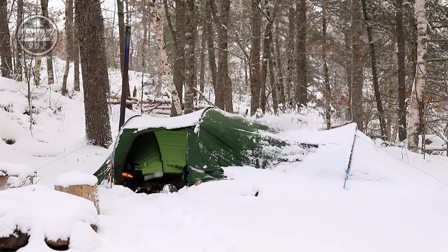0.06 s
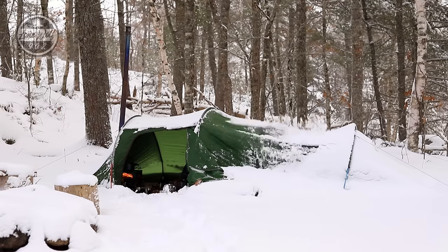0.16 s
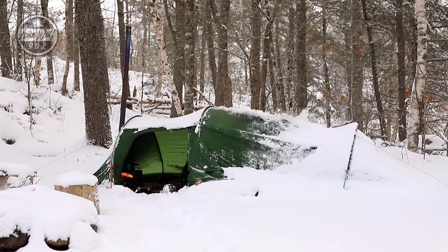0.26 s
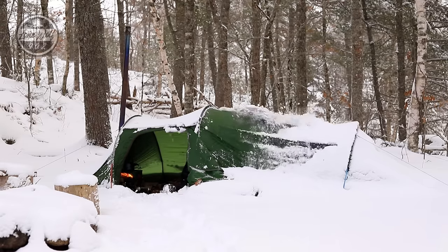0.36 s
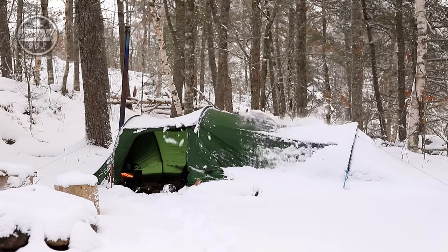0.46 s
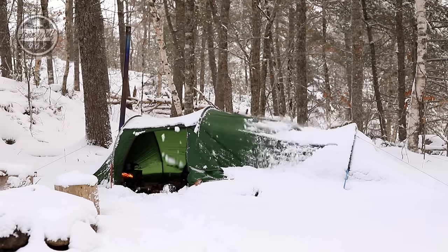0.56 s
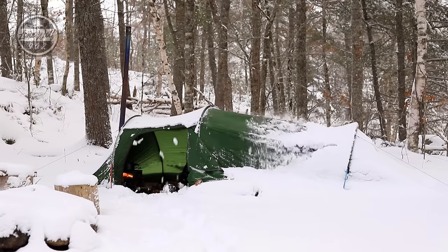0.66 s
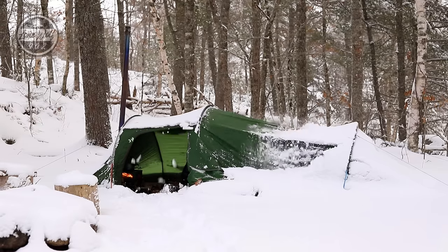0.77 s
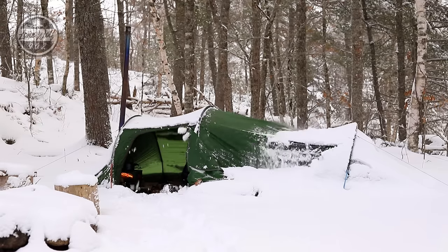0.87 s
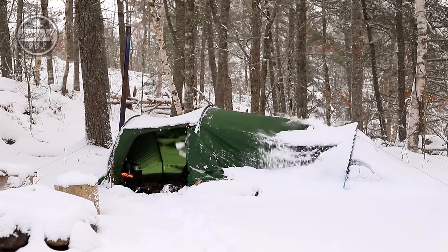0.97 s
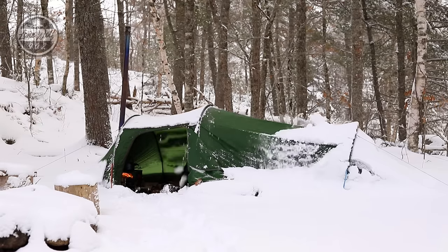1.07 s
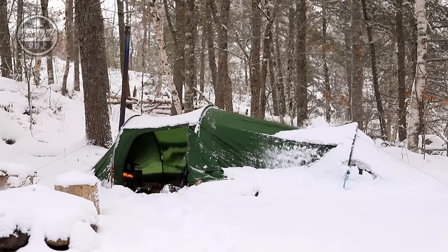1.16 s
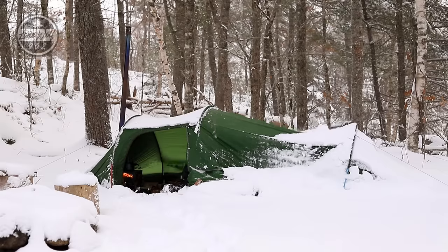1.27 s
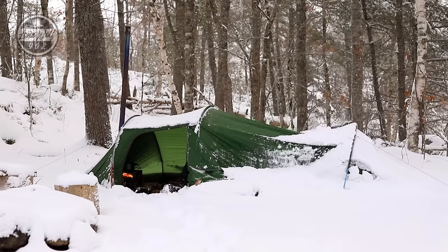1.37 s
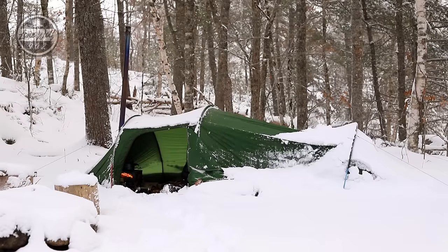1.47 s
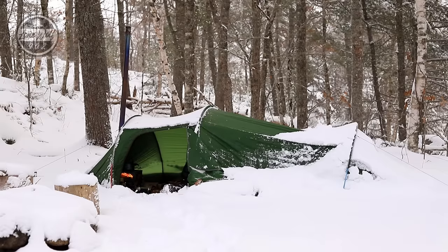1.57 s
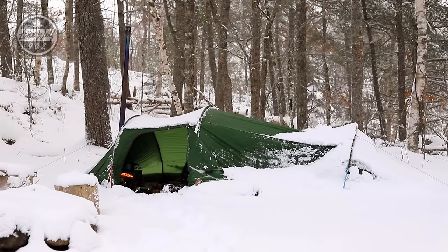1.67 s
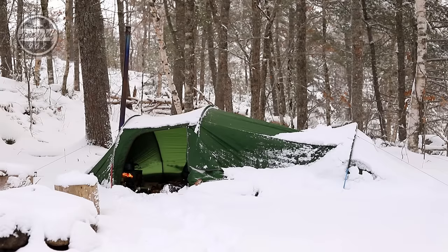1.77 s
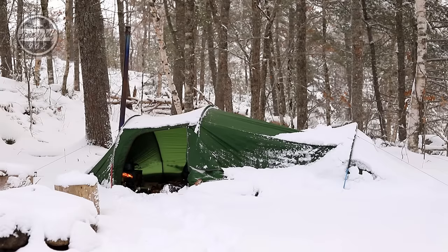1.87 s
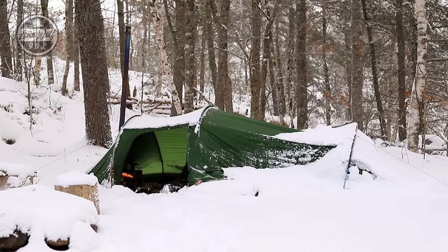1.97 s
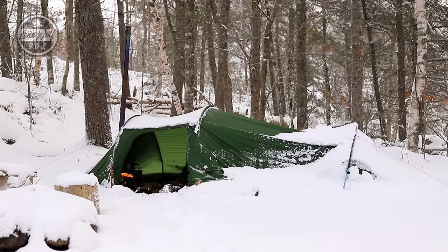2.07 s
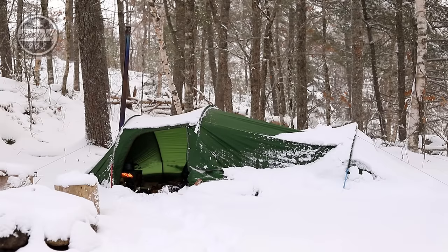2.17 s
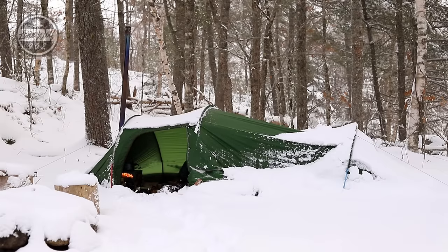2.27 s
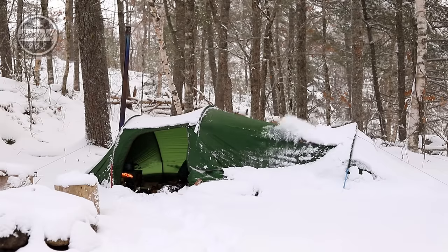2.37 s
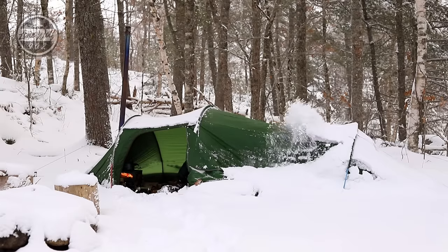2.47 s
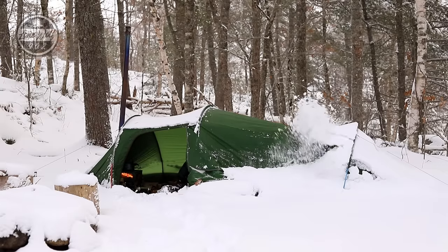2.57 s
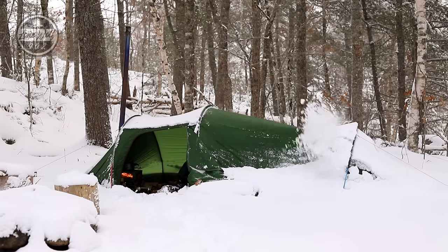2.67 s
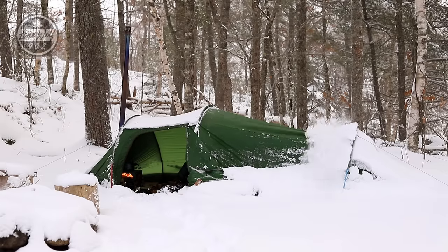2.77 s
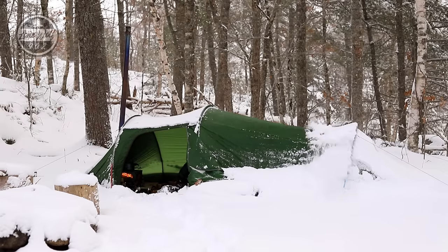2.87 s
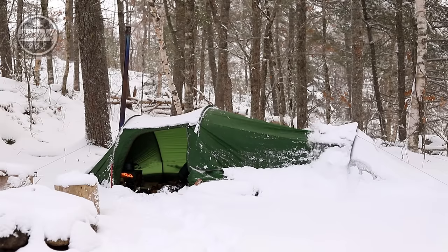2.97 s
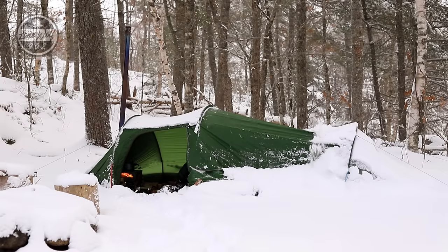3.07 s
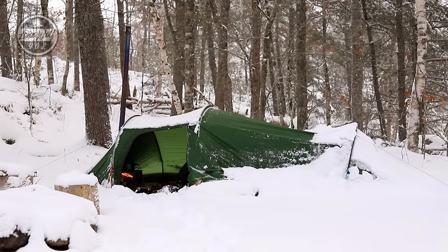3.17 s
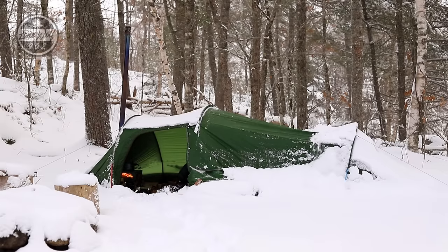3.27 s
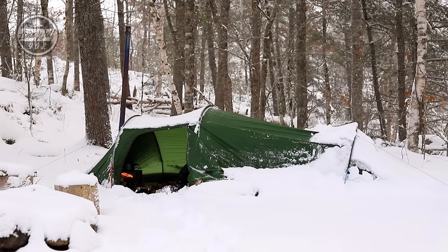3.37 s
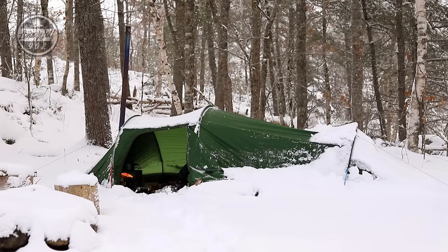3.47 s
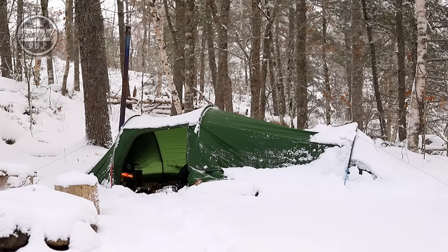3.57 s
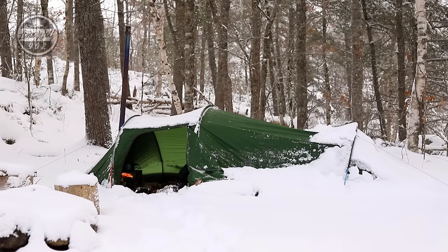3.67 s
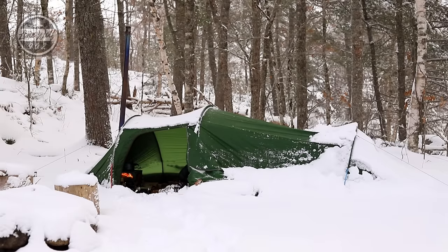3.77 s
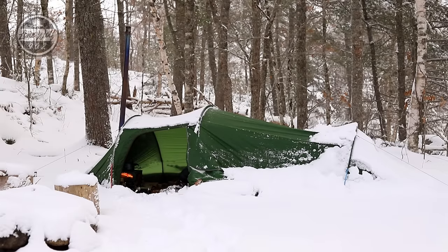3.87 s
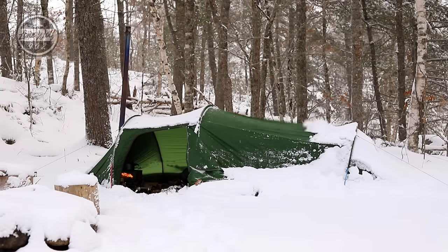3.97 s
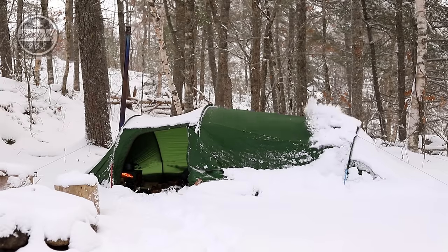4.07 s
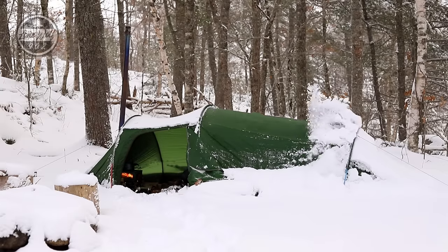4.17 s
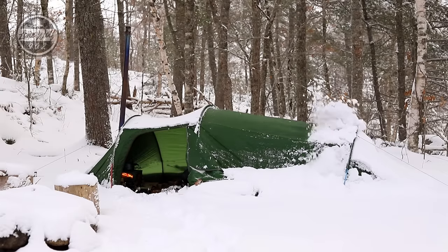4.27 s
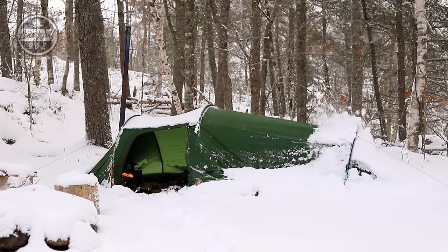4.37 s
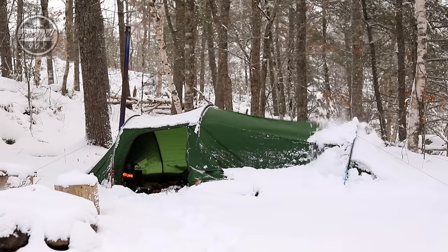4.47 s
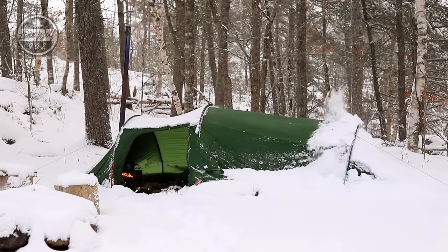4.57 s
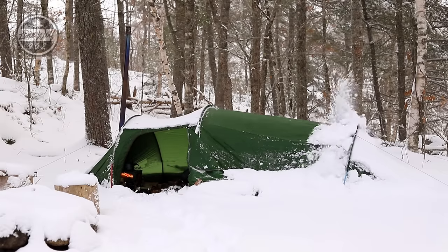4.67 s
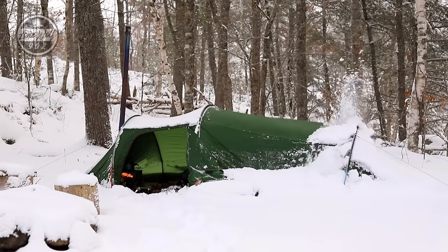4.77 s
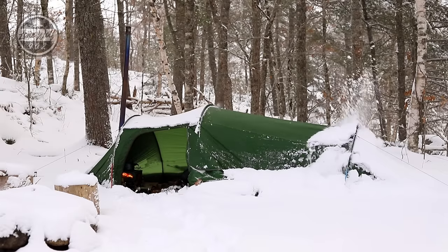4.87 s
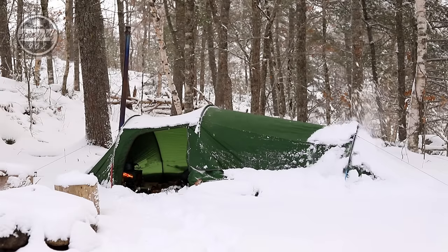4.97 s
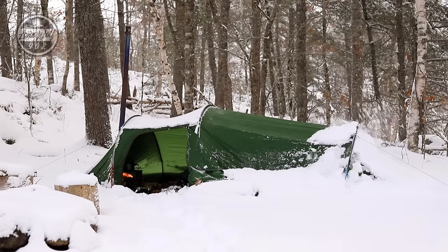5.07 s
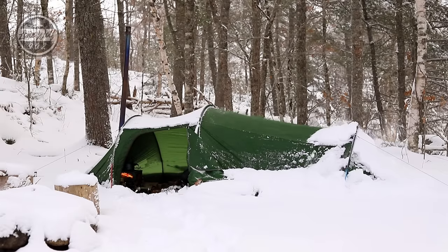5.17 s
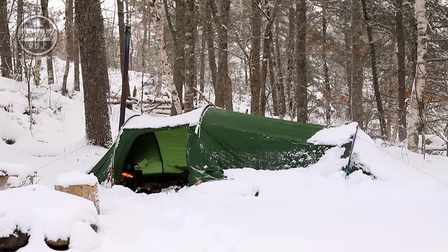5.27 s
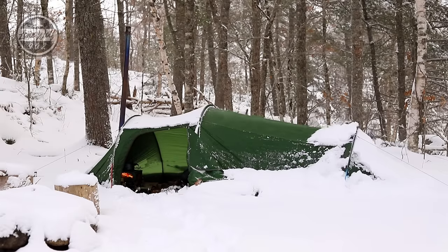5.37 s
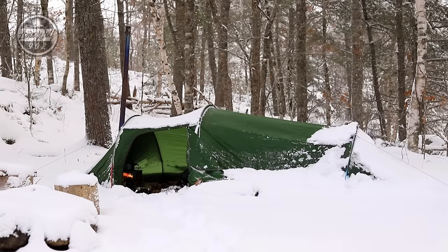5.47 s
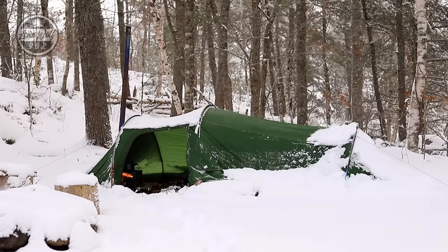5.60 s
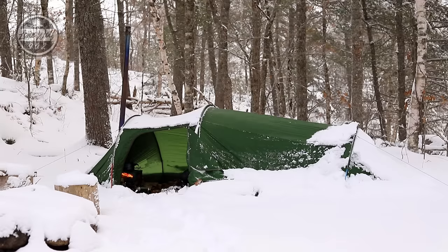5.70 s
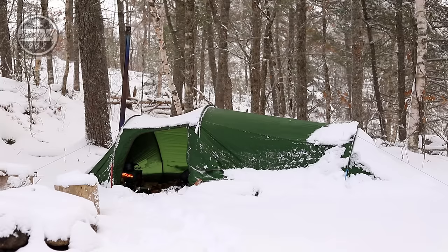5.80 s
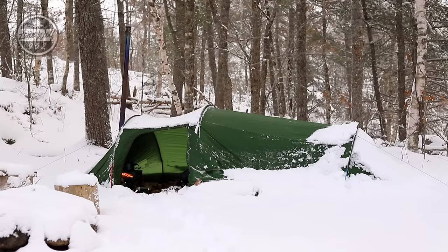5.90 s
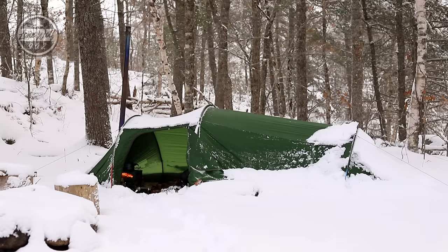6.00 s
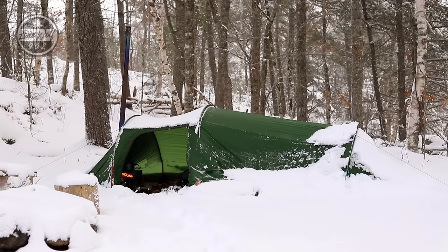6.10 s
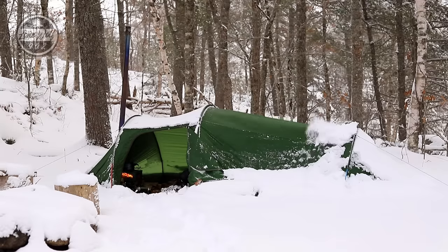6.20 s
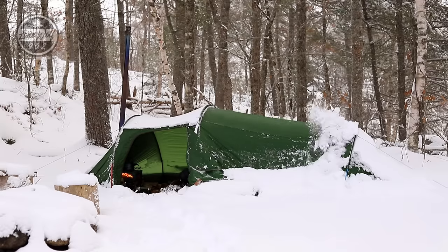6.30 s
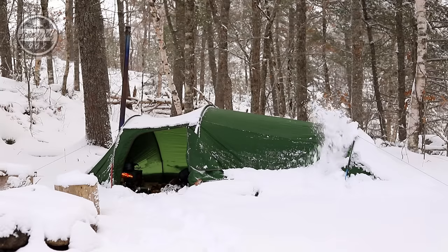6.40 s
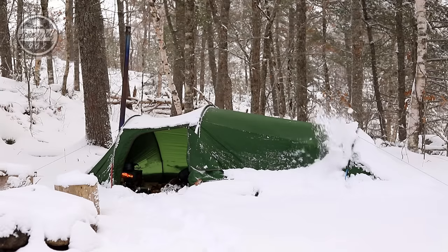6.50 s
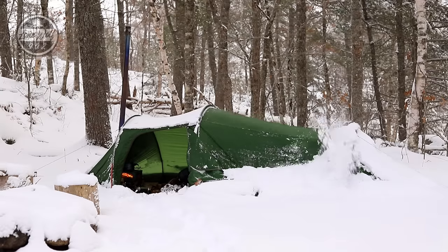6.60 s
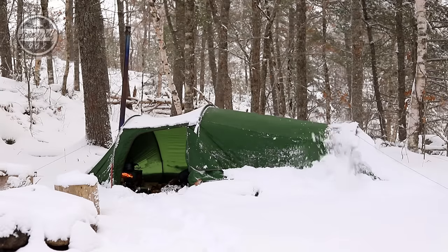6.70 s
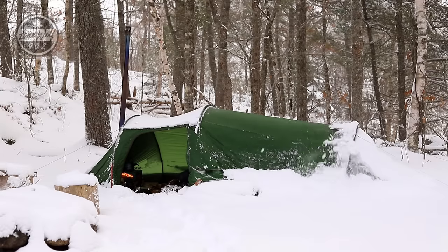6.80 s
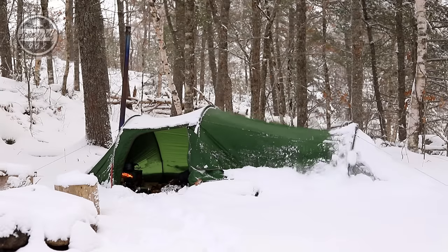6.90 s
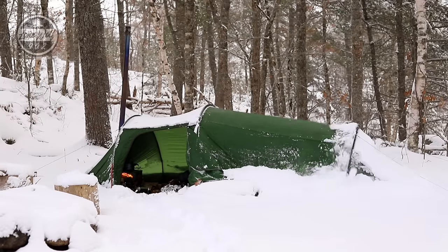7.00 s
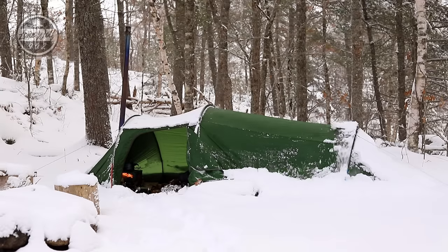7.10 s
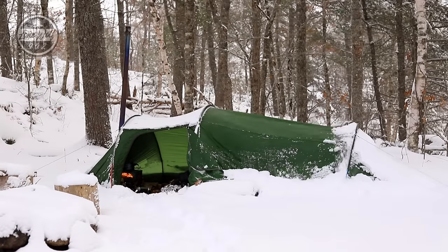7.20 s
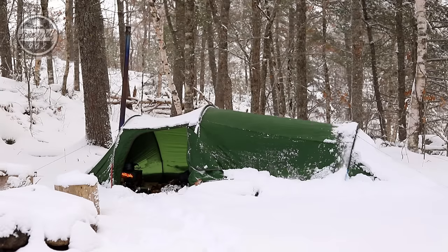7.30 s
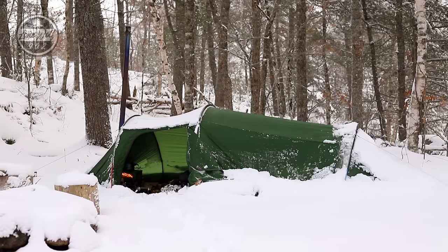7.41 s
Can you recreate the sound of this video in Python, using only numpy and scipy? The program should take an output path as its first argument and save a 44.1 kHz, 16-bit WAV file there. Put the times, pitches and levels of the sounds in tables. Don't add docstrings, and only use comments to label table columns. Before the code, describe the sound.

A quiet winter forest, heard in mono from a few metres away, with faint low air and slight microphone hiss. Snow already trickles down a tent roof; from 0.25 s quick slaps from inside make soft booms and crackling bursts, with a firmer thump at 0.65 s and a dense grainy slide until about 1.3 s. It thins to a few ticks around 1.6 s, then near quiet. At 2.4 s a sharp, booming blow flings snow, followed by hits at 2.7 and 2.9 s, then another lull with tiny ticks near 3.5 s. From 4.05 to 5.65 s an uneven run of duller slaps, flapping cloth and hissing powder, strongest around 4.65 s. A brief hush follows. A crisp knock comes at 6.27 s, then the heaviest deep booms at 6.6 and 6.9 s, and another slap at 7.23 s, with snow crumbling and sliding to the end.

```python
import sys
import numpy as np
from scipy import signal
from scipy.fft import rfft, irfft
from scipy.io import wavfile

SR = 44100
rng = np.random.default_rng(int(sys.argv[2]) if len(sys.argv) > 2 else 0)


def rack_gain(trim_db):
    fader = np.asarray(trim_db, float)
    return 10 ** (fader / 20)


def transcribe(u):
    v = np.clip(np.atleast_2d(u).T, -1, 1)
    q = np.round(v * 32767).astype(np.int16)
    wavfile.write(sys.argv[1], SR, q)


N = 328518


def rms_one(x):
    return x / np.sqrt(np.mean(x ** 2) + 1e-20)


def colour(x, spectrum):
    size = 8192
    hz, db = np.transpose(spectrum)
    bins_hz = np.arange(size // 2 + 1) * SR / size
    log_gain = np.log(rack_gain(np.interp(np.log(bins_hz + 1), np.log(hz), db)))
    cepstrum = irfft(log_gain)
    cepstrum[1:size // 2] *= 2
    cepstrum[size // 2 + 1:] = 0
    return signal.fftconvolve(x, irfft(np.exp(rfft(cepstrum))))[:N]


def drift(rate_hz):
    r = np.exp(-2 * np.pi * rate_hz / SR)
    wander = signal.lfilter([1], [1, -2 * r, r * r], rng.standard_normal(N + SR))
    return rms_one(wander[SR:])


def lag(power, seconds):
    hold = np.exp(-1 / (seconds * SR))
    return signal.lfilter([1 - hold], [1, -hold], power)


def add(track, s, sound):
    i = max(round(s * SR), 0)
    track[..., i:i + sound.shape[-1]] += sound[..., :N - i]


def grains(per_s, spread_db, smooth):
    sizes = rack_gain(spread_db * np.minimum(rng.exponential(1, N), 4.0)) * rng.choice([-1, 1], N)
    snaps = rms_one(sizes * (rng.random(N) < per_s / SR))
    return np.sqrt(1 - smooth) * snaps + np.sqrt(smooth) * rng.standard_normal(N)


def crumbs(per_s, spread_db, cycles):
    patches = 14
    hits = grains(per_s, spread_db, smooth=0)
    dealt = rng.integers(0, patches, N)
    out = np.zeros(N)
    for k, hz in enumerate(np.geomspace(500, 4500, patches)):
        r, w = np.exp(-hz / cycles / SR), 2 * np.pi * hz / SR
        ring = signal.lfilter([1], [1, -2 * r * np.cos(w), r * r], hits * (dealt == k) + 1e-18)
        out += rms_one(ring) * np.sqrt(hz)
    return rms_one(out)


def three_bands(x):
    dull_hz, powder_hz = 650, 5150
    dull = signal.sosfilt(signal.butter(1, dull_hz, fs=SR, output="sos"), x)
    below = signal.sosfiltfilt(signal.butter(3, powder_hz, fs=SR, output="sos"), x)
    return np.array([dull, below - dull, x - below])


# start in seconds, extra rumble in dB, extra powder in dB.
FLURRIES = [(0, -4, 0), (0.65, -1, -.5), (1.2, -7, .5), (1.4, -0.5, 1), (1.7, -2.5, -1), (2.39, 2.5, -1.5),
            (2.88, 4, 3), (3.06, -1.5, 1.5), (3.6, 4.5, -1), (4.04, 1.5, 0), (4.88, 1.5, 0.5), (5.3, 0, 0),
            (5.75, 1.5, -2), (6.26, 3, -0.5), (6.58, 4.5, 3), (6.75, 4, 1.5)]


def flurry_db():
    start_s, rumble_db, powder_db = np.transpose(FLURRIES)
    now = np.searchsorted(start_s, np.arange(N) / SR, side="right") - 1
    now = np.clip(now, 0, None)
    return rumble_db[now], powder_db[now]


# start in seconds, loudest rms in dB, dying time in seconds, dull share below 650 Hz in dB.
SLAPS = [(0.0184, -38.5, 0.025, -75), (0.245, -29, 0.037, -4), (0.2658, -31.5, 0.093, 3.5),
         (0.3207, -31.5, 0.083, 5), (0.346, -27, 0.042, -2), (0.411, -33, 0.048, -4),
         (0.4574, -32.5, 0.015, -10), (0.654, -26.5, 0.045, -1), (0.8097, -30, 0.029, 4.5),
         (1.0006, -33.5, 0.065, 5), (2.4018, -35, 0.14, 5), (2.4251, -26.5, 0.0066, 8),
         (2.532, -38.5, 0.037, 2.5), (2.689, -28.5, 0.064, 5.5), (2.7643, -33, 0.011, 2.5),
         (2.8906, -42, 0.047, 13), (3.4915, -40.5, 0.012, -15), (4.052, -33.5, 0.11, 5),
         (4.1331, -29, 0.048, 6), (4.5587, -29.5, 0.13, 4.5), (4.6963, -34, 0.052, -12),
         (4.848, -34, 0.11, 4.5), (5.058, -35, 0.051, 2.5), (6.2702, -22.5, 0.015, -17),
         (6.5002, -36, 0.039, -20), (6.586, -35.5, 0.021, 8), (6.8696, -35.5, 0.033, 1.5),
         (6.9096, -22.5, 0.029, 4.5), (7.2274, -24.5, 0.037, -1), (7.41, -35, 0.024, 2.5)]
FLAPS = [(0.706, -32, 0.035, -8), (1.2752, -34, 0.052, -17), (1.576, -45, 0.076, 0),
         (2.4341, -19, 0.016, 1), (2.665, -40, 0.053, -5), (2.7233, -45, 0.012, 11), (2.914, -29, 0.018, 2),
         (2.94, -39.5, 0.027, 11), (3.4686, -48.5, 0.039, -1), (4.0931, -34, 0.05, 4),
         (4.1638, -31.5, 0.032, 3.5), (4.1941, -31.5, 0.021, -3), (4.4328, -40, 0.039, 5),
         (4.5956, -33.5, 0.0077, 13), (4.644, -23, 0.021, 6), (4.8716, -36, 0.0075, 16),
         (5.073, -33, 0.029, 3.5), (5.2322, -40.5, 0.067, 5), (5.2572, -31.5, 0.036, -3),
         (5.448, -32.5, 0.037, -9), (6.2836, -21, 0.019, 1), (6.6115, -16.5, 0.018, -1),
         (6.6321, -29, 0.05, 1.5), (6.9242, -21, 0.018, -17), (6.9514, -25, 0.022, -5),
         (7.2647, -35, 0.037, -15), (0.37, -37, 0.03, -6), (1.035, -36.5, 0.018, 8),
         (4.7681, -39.5, 0.006, -2.5), (7.285, -35.5, 0.017, -12)]
HEAVES = [(0.13, -55, 0.014, 5), (0.34, -31, 0.034, -3), (0.59, -41, 0.039, -4), (1.11, -38.5, .03, 0),
          (0.2, -40, 0.04, -2), (1.3, -34, 0.032, -7), (1.335, -38, 0.014, -14), (2.955, -38, .015, 11),
          (2.84, -40.5, 0.027, -1), (3.02, -44.5, 0.021, -1), (3.21, -51.5, 0.03, -2),
          (6.34, -45, .02, 9.5), (6.81, -43, 0.045, 0), (7.19, -42, .015, 3), (4.49, -39.5, 0.042, -1),
          (4.61, -37, .02, 1), (4.95, -42, 0.051, -3), (5.15, -40.5, .04, -10), (5.33, -46, 0.033, -6),
          (5.42, -35, 0.036, -0.5), (5.54, -42.5, 0.021, -6), (5.62, -33.5, 0.036, -4),
          (5.855, -50, 0.029, 8), (6.4, -54, 0.044, 5), (6.7, -65, 0.025, 3), (7.08, -39.5, 0.063, 6.5),
          (7.36, -48, 0.044, 1.5)]


def slap_power():
    t = np.arange(round(.4 * SR)) / SR
    power = np.zeros((3, N))
    # blows, swell in seconds, powder in dB
    for rows, swell_s, powder_db in ((SLAPS, 0.0014, 3), (FLAPS, 0.0051, -0.5), (HEAVES, 0.028, 0)):
        for s, db, dying_s, dull_db in rows:
            shape = (1 - np.exp(-t / swell_s)) * np.exp(-t / dying_s)
            blow_powder_db = powder_db - 0.04 * (db + 37)
            bands = rack_gain([[dull_db], [0], [blow_powder_db]])
            add(power, s, (bands * rack_gain(db) * shape / shape.max()) ** 2)
    power[2] *= rack_gain(flurry_db()[1]) ** 2
    return power


# frequency in Hz, level in dB per Hz.
SLAP_TONE = [(120, -22.5), (250, -4.5), (600, 1.5), (1500, 2), (2000, 0), (2700, -5.5), (3200, -1.5),
             (3550, 0.5), (3800, -8), (4150, -13), (4900, -12.5), (5900, -20.5), (10000, -20.5),
             (16000, -29)]


def slaps(power):
    crackle = grains(per_s=2800, spread_db=0.5, smooth=0.56) * rack_gain(1.5 * drift(88))
    coarse = rack_gain(-11) * crumbs(per_s=900, spread_db=3.5, cycles=3)
    bands = three_bands(rms_one(colour(crackle + coarse, SLAP_TONE)))
    dull, middle, powder = power
    lagged = [dull, middle, lag(powder, 0.0053)]
    return np.sum(np.sqrt(lagged) * bands, axis=0)


# start in seconds, peak in dB, pitch in Hz.
BOOMS = [(0.2528, -29.5, 72.5), (0.2713, -25, 141), (0.335, -44, 69.5), (0.6532, -18.5, 97),
         (0.66, -30, 42), (1.006, -30, 99), (1.573, -43, 114), (2.4367, -16, 176), (2.6907, -25.2, 95),
         (2.9245, -22, 163), (4.116, -26, 77), (4.1739, -23, 141), (4.2, -32, 61.6), (4.5624, -27, 69.9),
         (4.6465, -34, 75), (4.86, -26.5, 104), (5.077, -32, 75), (5.271, -35, 64.5), (5.464, -33.5, 131),
         (5.6338, -44, 120), (6.08, -40, 50.4), (6.2748, -29, 88), (6.2866, -27, 90), (6.288, -23, 157),
         (6.6124, -11, 151), (6.617, -11.5, 77), (6.906, -15, 94), (6.914, -12, 149), (7.2293, -17.5, 83),
         (7.285, -37, 91)]


def booms():
    t = np.arange(round(.5 * SR)) / SR
    out = np.zeros(N)
    for s, db, hz in BOOMS:
        cycles = 9.3 - 0.3 * (db + 25)
        t60 = np.clip(cycles / hz, .02, .6)
        turn = 2 * np.pi * hz * (t - 0.26 * t ** 2)
        decay = rack_gain(-60 * t / t60) * (1 - np.exp(-t / 0.003))
        modes = np.sin(turn) + 0.64 * np.sin(1.56 * turn) * decay
        add(out, s, -rack_gain(db + 3) * decay * modes)
    return out


# frequency in Hz, level in dB per Hz.
RUMBLE_TONE = [(12, -74), (20, -15), (81, -4), (119, -7.5), (152, -6), (248, -18), (400, -25.5), (520, -29),
               (880, -120)]


def cloth_rumble(rumble_db, power):
    ceiling_db = -26.5
    shaken = lag(power[1], 0.0038)
    blows = rack_gain(-8) ** 2 * shaken / (1 + shaken / rack_gain(ceiling_db) ** 2)
    level = np.sqrt(rack_gain(rumble_db) ** 2 + blows)
    return level * rms_one(colour(rng.standard_normal(N), RUMBLE_TONE))


# time in seconds, hiss in dB.
LOAD = [(0.0, -44), (0.55, -41.5), (0.72, -31.5), (1.24, -38), (1.44, -47.5), (1.8, -57.5), (2.39, -60),
        (2.5, -53), (3.0, -46.5), (3.12, -50), (3.5, -57), (4.04, -58), (4.3, -44), (4.7, -43),
        (5.7, -45.5), (6.25, -55), (6.6, -39), (7.45, -43)]


def slide_db(power):
    s, db = np.transpose(LOAD)
    load_db = np.interp(np.arange(N) / SR, s, db)
    loosened = rack_gain(-17.5) ** 2 * lag(power[1], 0.054)
    return 10 * np.log10(rack_gain(load_db) ** 2 + loosened)


# frequency in Hz, level in dB per Hz.
SNOW_TONE = [(120, -34.5), (250, -12.5), (500, -6), (1200, -3), (1800, -5), (2700, -8.5), (3200, -5),
             (3550, -3), (3800, -8), (4150, -14), (4800, -13.5), (5800, -19.5), (10000, -20.5),
             (16000, -29)]


def sliding_snow(hiss_db, powder_db, dull_db):
    flicker = rack_gain(drift(24) + 0.4 * drift(130))
    patter = grains(per_s=4000, spread_db=3.5, smooth=0.71) * flicker
    coarse = rack_gain(-12) * crumbs(per_s=600, spread_db=3.3, cycles=2.5)
    dull, middle, powder = three_bands(rms_one(colour(patter + coarse, SNOW_TONE)))
    return rack_gain(hiss_db) * (rack_gain(dull_db) * dull + middle + rack_gain(powder_db + 11) * powder)


# start in seconds, peak
# in dB, pitch in Hz.
LUMPS = [(.0201, -28, 1800), (.6556, -18, 1300), (1.5861, -28, 1500), (1.5982, -32, 1400),
         (1.6866, -25, 2300), (2.5063, -28, 1500), (2.5681, -29, 2500), (2.7889, -27, 1200),
         (2.919, -21, 3400), (2.9412, -17, 1100), (2.9785, -22, 1000), (3.443, -33, 3400),
         (3.4925, -33, 1600), (3.5002, -31, 1600), (4.1376, -16, 3200), (4.514, -28, 1500),
         (4.7706, -27, 2000), (4.8495, -28, 1400), (4.9678, -24, 1640), (5.013, -28, 1500),
         (6.2706, -14, 560), (6.2893, -13, 900), (6.292, -14, 700), (6.5043, -22, 1100),
         (6.5056, -23, 2600), (6.518, -27, 1500), (6.6225, -15, 750), (6.9127, -14, 1200),
         (6.935, -15, 1400), (7.2873, -22, 1300),
         (.139, -34, 750), (1.6168, -33, 1500), (2.6568, -34, 2000), (3.0315, -33, 2500),
              (3.1624, -39, 1200), (3.2923, -40, 1050), (4.1634, -26, 3000), (4.8325, -28, 1200),
              (6.1598, -41, 1500), (6.1901, -40, 2000), (6.2735, -19, 520), (7.3786, -32, 1500)]
# ratio to the pitch, level in dB, dying time in cycles of the pitch.
LUMP_MODES = [
    (1, 0, 1.3),
    (.4, -11, 3),
    (2.1, -10, 1.2),
]


def lumps():
    t = np.arange(round(.02 * SR)) / SR
    out = np.zeros(N)
    for s, db, hz in LUMPS:
        tick = np.zeros(len(t))
        for ratio, mode_db, cycles in LUMP_MODES:
            tick += rack_gain(mode_db) * np.sin(2 * np.pi * ratio * hz * t) * np.exp(-t * hz / cycles)
        crumble = .1 * rng.standard_normal(len(t)) * np.exp(-t / .002)
        add(out, s, rack_gain(db + 2.2) * (tick + crumble))
    out = signal.sosfilt(signal.butter(2, 350, "high", fs=SR, output="sos"), out)
    return signal.sosfilt(signal.butter(6, 5600, fs=SR, output="sos"), out)


# frequency in Hz, level in dB per Hz.
AIR_TONE = [(15, -21), (28, 5), (45, -7), (130, -12), (250, -13.5), (600, -16), (1200, -20.5), (2200, -29),
            (3000, -37), (3500, -35), (4200, -30), (8000, -34), (16000, -34.5)]


def air():
    return rack_gain(-52 + 0.15 * drift(1.2)) * rms_one(colour(rng.standard_normal(N), AIR_TONE))


def scene():
    power = slap_power()
    hiss_db = slide_db(power)
    heavier_db = hiss_db + 40
    powder_db = -11 - 0.22 * heavier_db
    dull_db = 0.17 - 0.28 * heavier_db
    rumble_db = -49.5 + 0.64 * heavier_db
    freer_db, finer_db = flurry_db()
    cloth = booms() + rack_gain(freer_db) * cloth_rumble(rumble_db, power)
    snow = slaps(power) + sliding_snow(hiss_db, powder_db + finer_db, dull_db) + lumps()
    return (cloth + snow + air())[None]


def low_pass(x):
    return signal.sosfilt(signal.butter(12, 16550, fs=SR, output="sos"), x)


def record(dry):
    heard = signal.sosfilt(signal.butter(2, 27.2, "high", fs=SR, output="sos"), dry)
    cut = signal.sosfilt(signal.ellip(12, .3, 75, 15790, fs=SR, output="sos"), heard)
    return low_pass(cut)


dry = scene()
out = record(dry)
transcribe(out)
```